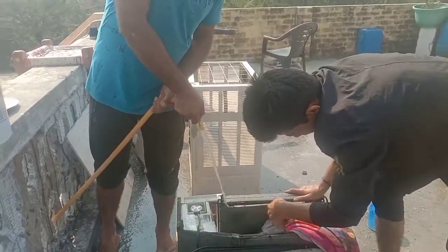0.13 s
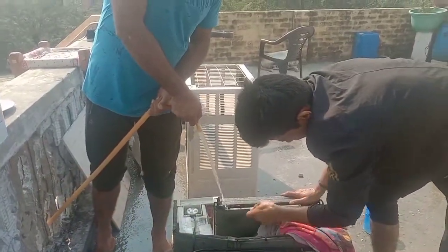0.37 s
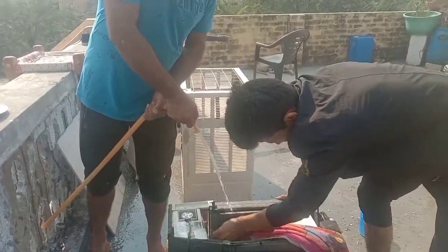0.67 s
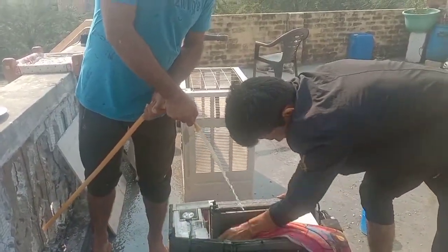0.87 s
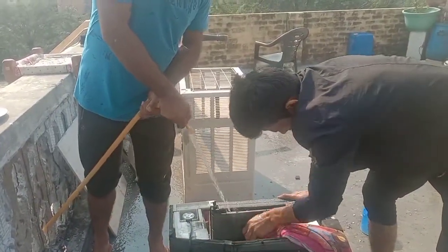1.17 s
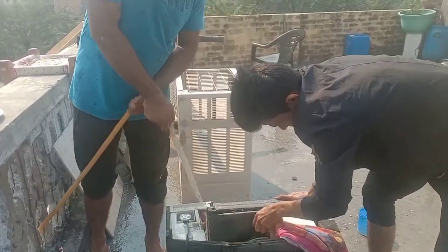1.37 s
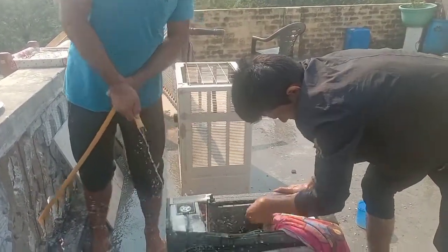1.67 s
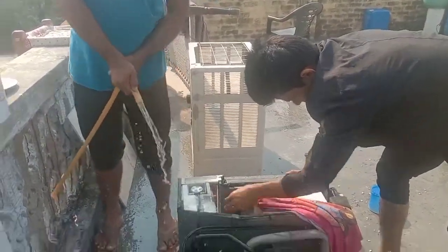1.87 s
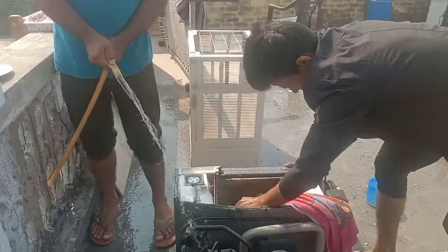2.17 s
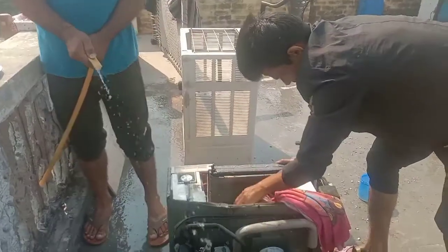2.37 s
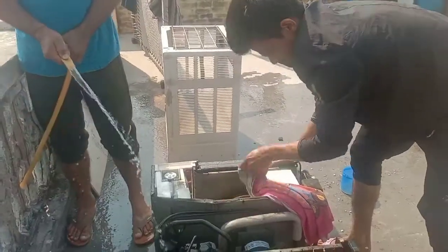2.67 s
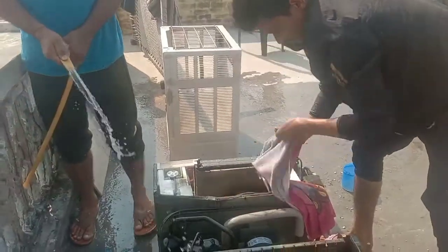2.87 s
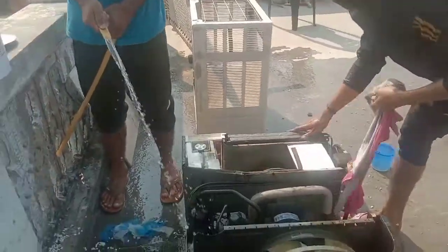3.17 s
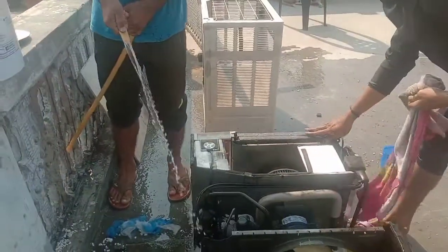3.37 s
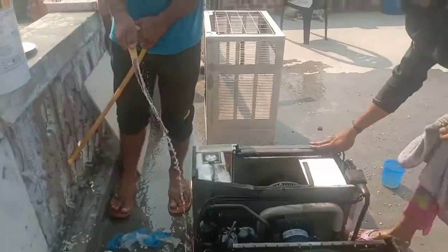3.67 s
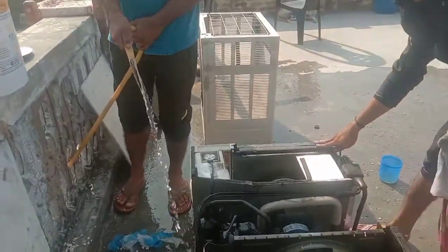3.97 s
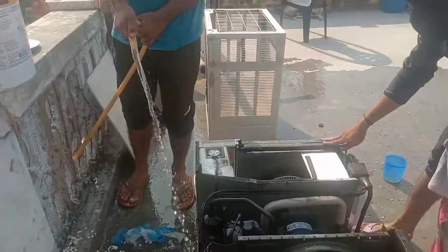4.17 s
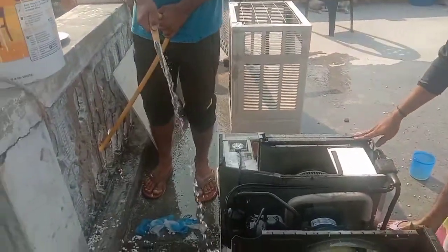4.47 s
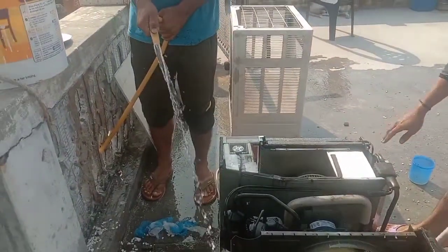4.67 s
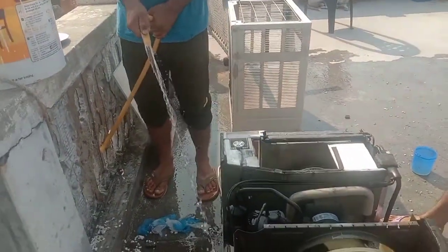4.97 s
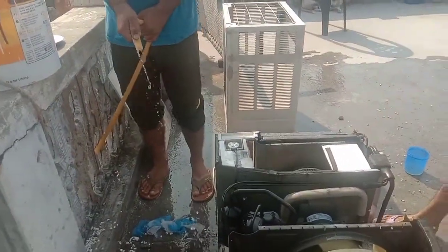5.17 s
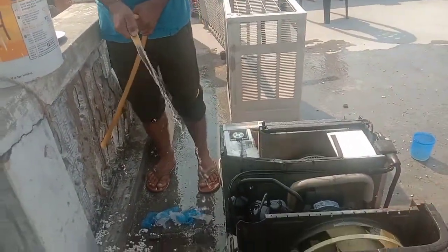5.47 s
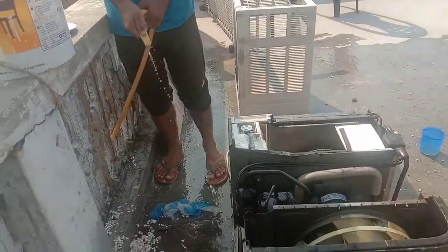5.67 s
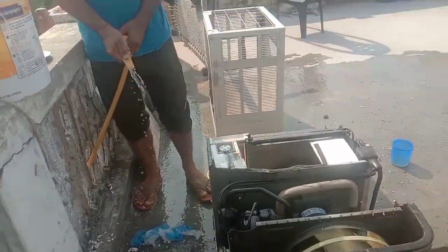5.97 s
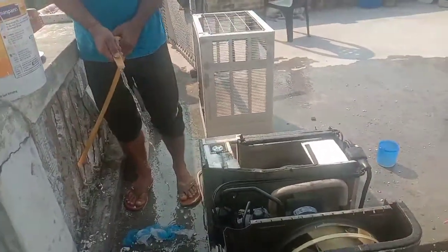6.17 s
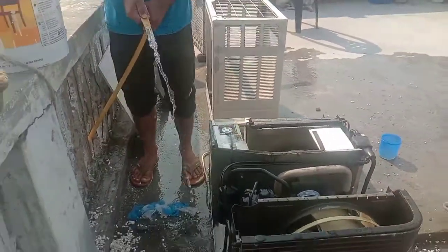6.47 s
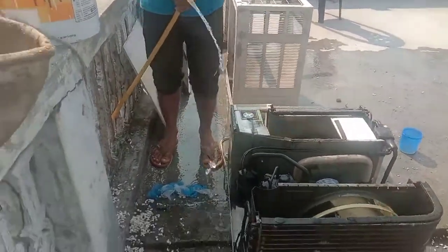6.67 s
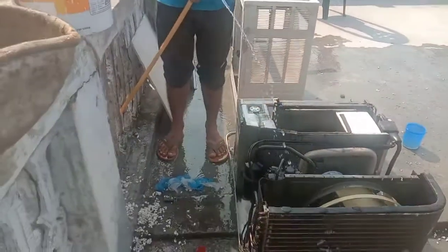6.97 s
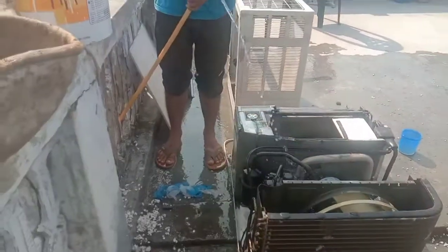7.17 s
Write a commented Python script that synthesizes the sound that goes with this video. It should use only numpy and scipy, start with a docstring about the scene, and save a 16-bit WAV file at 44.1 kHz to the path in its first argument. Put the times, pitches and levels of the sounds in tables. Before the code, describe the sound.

Water first rings and gurgles inside an opened machine's metal tray, then lands in uneven slugs, splats and drops on a wet rooftop floor.

```python
"""On a flat roof a garden hose drums into the metal tray of an opened machine, then its jet breaks up and lands
in slugs and drops on wet concrete and casing. Jet and landings are band noise under moving power; trapped air,
bubbles and the tray's own note are dying sines. Resonances ring the metal with all the water.
A faint town rumble of coloured noise with a hum lies below, and a hand nudges the phone with low thuds."""
import sys
import numpy as np
from scipy import signal
from scipy.fft import rfft, irfft
from scipy.io import wavfile

SR = 44100
rng = np.random.default_rng(int(sys.argv[2]) if len(sys.argv) > 2 else 0)


def put_to_file(sound):
    """Save the sound as 16-bit audio at rate SR, in the file named by the first command-line argument."""
    columns = np.atleast_2d(sound).T  # one column per channel
    safe = np.clip(columns, -1, 1)
    whole_steps = np.round(safe * 32767)
    wavfile.write(sys.argv[1], SR, whole_steps.astype(np.int16))


N = 322679
HOP = 16   # samples per step of the coarse time grid
GRID_S = np.arange(N // HOP + 1) * HOP / SR
BAND_HZ = 130 * 2 ** (np.arange(43) / 6)   # centres of the sixth-octave bands


def from_db(db):
    """Amplitude from dB; twice the dB gives power."""
    return 10 ** (np.asarray(db) / 20)


def rms_one(x):
    """Scales each row to an rms of 1."""
    return x / np.sqrt(np.mean(x ** 2, axis=-1, keepdims=True) + 1e-20)


def drift(rate_hz, count):
    """Slow chance on the coarse grid, spread 1: white noise through two equal lowpass poles."""
    r = np.exp(-2 * np.pi * rate_hz * HOP / SR)
    white = rng.standard_normal((count, N // HOP + 2001))
    slow = signal.lfilter([1], [1, -2 * r, r * r], white)
    return rms_one(slow[:, 2000:])   # the filter has settled by then


def to_samples(coarse):
    """Draws a curve on the coarse grid out to every sample."""
    return np.interp(np.arange(N) / HOP, np.arange(len(coarse)), coarse)


def resonance(x, hz, width_hz):
    """One ringing mode, a two-pole filter with gain 1 on top."""
    r = np.exp(-np.pi * width_hz / SR)
    feed = [(1 - r * r) / 2, 0, (r * r - 1) / 2]
    return signal.lfilter(feed, [1, -2 * r * np.cos(2 * np.pi * hz / SR), r * r], x)


def share(hz, octaves):
    """How the power of one landing spreads over the bands: a bell in log pitch, sum 1."""
    bell = np.exp(-.5 * (np.log2(BAND_HZ[:, None] / hz) / octaves) ** 2)
    return bell / bell.sum(axis=0)


def sound_of(power):
    """Noise gated by each row of power, then rung through its sixth-octave band."""
    out, white, step = np.zeros(N), rng.standard_normal((3, N)), 2 ** (1 / 12)
    for k, hz in enumerate(BAND_HZ):
        band = signal.butter(2, [hz / step, hz * step], "band", fs=SR, output="sos")
        gated = to_samples(np.sqrt(power[k])) * white[k % 3]   # neighbouring bands use different noise
        level = np.sqrt(SR / 2 / (hz * (step - 1 / step)))   # makes up for the narrow band
        out += signal.sosfilt(band, gated) * level
    return out


# The jet and the landings thin out and come back.
# Each row: start in seconds, end in seconds, depth in dB.
JET_BREAKS = [(0.077, 0.151, -8.5), (1.824, 1.871, -10), (2.004, 2.046, -14), (2.613, 2.735, -18.5),
              (2.861, 2.936, -7.5), (2.978, 3.048, -7), (3.296, 3.44, -6.5), (3.457, 3.496, -8),
              (3.671, 3.722, -14.5), (4.266, 4.304, -6), (5.438, 5.631, -17), (6.081, 6.35, -10),
              (6.53, 6.603, -5), (7.175, 7.291, -16.5)]


def breaks_db():
    """The water thins out over 12 ms and returns within the last 2 ms of each break."""
    out = 0
    for start, end, depth_db in JET_BREAKS:
        thinning = np.clip((GRID_S - start) / 0.012, 0, 1)
        until_return = np.clip((end - GRID_S) / 0.002, 0, 1)
        out = out + depth_db * thinning * until_return
    return out


# The running jet, its strength blended from row to row.
# Each row: time in seconds, then relative dB of drumming in the tray, splash, and fine spray.
JET_COURSE = [(0.0, -48.5, -50.5, -71), (0.16, -50, -55.5, -70), (0.61, -52, -51.5, -65),
              (0.96, -56, -54, -72), (1.36, -48, -50.5, -63.5), (1.65, -67, -41.5, -45.5),
              (1.89, -73, -63.5, -75), (2.4, -68.5, -68.5, -57), (2.57, -62.5, -72, -67),
              (2.79, -58, -56.5, -54.5), (2.93, -58, -56, -79), (3.46, -58.5, -51, -52.5),
              (3.97, -70.5, -51.5, -49), (5.24, -60, -44.5, -55.5), (5.4, -75, -61, -66),
              (5.68, -55.5, -59, -64), (5.83, -54.5, -51.5, -53.5), (6.05, -69, -69, -90),
              (6.36, -69.5, -64.5, -62), (6.56, -73.5, -64.5, -71), (6.95, -63, -64.5, -68.5),
              (7.32, -73.5, -57, -55)]
SLOP_LEANS = 0.34     # pooled water slops between drumming and splash: share of the drumming
DRUM_LINGERS = 0.092  # share of a break that the drumming rides through


def jet_levels():
    """The four parts of the jet in relative dB: drumming, slop, splash and spray."""
    s, *columns = np.transpose(JET_COURSE)
    drum, splash, spray = [np.interp(GRID_S, s, db) for db in columns]
    slop = SLOP_LEANS * drum + (1 - SLOP_LEANS) * splash
    break_share = np.array([[1 - DRUM_LINGERS], [1], [1], [1]])
    return np.array([drum, slop, splash, spray]) + breaks_db() * break_share


# Where the four parts of the jet sit in pitch, from drumming to spray.
# Each entry: frequency in Hz.
JET_PART_HZ = [380, 1050, 3500, 11000]
DROPS_PER_S, DROP_SPREAD_DB = 500, 3
DROP_CYCLES = 88    # cycles in which a drop dies by 60 dB, the pitch held within 1200 to 5000 Hz
DROP_SHARE = 0.58   # most of a band's power that comes in drops


def stream(flicker_db, surge_db):
    """Power per band of the running jet: an even wash, and small drops that light up some bands and die."""
    parts = np.arange(len(JET_PART_HZ))
    place = np.interp(np.log(BAND_HZ), np.log(JET_PART_HZ), parts)
    blend = np.clip(1 - abs(place[:, None] - parts), 0, 1)   # each band lies between two parts
    below_db = -14 * np.clip(np.log2(270 / BAND_HZ), 0, None)   # little lies under the note of the tray
    mean_db = blend @ jet_levels() + below_db[:, None] - 12.0

    draw = rng.random((mean_db.shape[1], 4))
    born = draw[:, 0] < DROPS_PER_S * HOP / SR
    size, pitch, width = draw[born, 1:].T
    strength = from_db(2 * DROP_SPREAD_DB * np.minimum(-np.log(size), 2.8))
    hits = np.zeros_like(mean_db)
    hits[:, born] = strength * share(400 * 2 ** (5.4 * pitch), 0.47 + 0.97 * width * pitch)   # high drops spread
    poles = from_db(-120 * HOP / SR * np.clip(BAND_HZ, 1200, 5000) / DROP_CYCLES)
    dying = np.array([signal.lfilter([1], [1, -r], row) for r, row in zip(poles, hits)])
    drops = np.clip(DROP_SHARE * place / 2, 0, DROP_SHARE)[:, None]   # the low roar stays even
    grain = 1 - drops + drops * dying / dying.mean(axis=1, keepdims=True)

    flicker = np.clip(place / 2, .55, 1)[:, None] * drift(10.0, count=len(BAND_HZ))
    wobble_db = flicker_db * flicker + surge_db * drift(32.5, count=1)
    return from_db(1.9955 * (mean_db + wobble_db)) * grain


# Slugs and big drops landing.
# Each row: start in seconds, level in dB, centre in Hz, width in octaves, spatter in dB against the slap.
LANDINGS = [(0.147, -22, 2050, 0.64, -6.5), (0.497, -26.5, 1760, 0.41, -4), (1.6767, -14, 1276, 1.8, -24),
            (1.6915, -6, 2276, 0.5, -10.5), (1.7774, -19, 1210, 1.9, -20),
            (1.8739, -10.5, 2550, 0.29, -20.5), (1.88, -30, 1192, 0.29, -15),
            (2.053, -27.5, 5470, 0.41, -10), (2.069, -26, 7700, 0.44, -10), (2.206, -27.5, 5100, 0.38, -25),
            (2.222, -28, 5700, 0.4, -13.5), (2.299, -27.5, 12000, 0.4, -11),
            (2.3247, -11, 3370, 1.53, -17.5), (2.402, -35, 1320, 1.17, 10),
            (2.489, -18.5, 2870, 1.16, -15.5), (2.509, -20, 1420, 0.49, -17),
            (2.739, -37.5, 3720, 0.5, 6.5), (2.774, -24.5, 4640, 0.15, -15), (2.811, -20, 2260, 1, -6),
            (2.827, -19, 2400, 0.33, -13), (2.8519, -25, 8250, 0.69, -4), (2.953, -25.5, 1320, 1.4, 1),
            (3.06, -21.5, 3900, 0.63, -25), (3.0775, -20, 2700, 0.97, -15), (3.146, -27.5, 6700, 0.29, -11),
            (3.208, -31.5, 2970, 0.66, 1.5), (3.3883, -24.5, 7030, 0.1, -18),
            (3.591, -25.5, 4860, 0.42, -2.5), (3.71, -29, 1390, 0.15, -17), (3.788, -20, 6700, 0.44, -9),
            (3.809, -20.5, 4180, 0.2, -31), (3.871, -23.5, 938, 0.65, -1), (3.916, -22, 5400, 0.39, -31),
            (3.936, -23, 6300, 0.39, -3.5), (4.024, -21.5, 3500, 0.36, -1), (4.153, -14, 3270, 0.43, -13),
            (4.302, -18, 4300, 0.34, -14), (4.3635, -14, 1745, 0.56, -10), (4.413, -18, 2600, 1.48, -5.5),
            (4.481, -26, 1223, 0.87, -2), (4.571, -20, 5700, 0.29, -40), (4.883, -39, 5260, 0.18, -29),
            (4.966, -27, 3030, 0.4, -5), (5.1185, -10, 2140, 0.9, -9.5), (5.3007, -18.5, 1650, 1.23, -10),
            (5.319, -17.5, 2280, 0.28, -14), (5.4001, -16, 2710, 0.66, -24), (5.5515, -23, 5900, 0.8, -22),
            (5.586, -14, 7750, 0.38, -23), (5.636, -26, 2950, 0.56, 7), (5.642, -10, 2430, 0.97, -10.5),
            (5.705, -16, 2580, 0.89, -8), (5.7876, -23.5, 6030, 0.16, -10.5),
            (5.864, -24.5, 4140, 0.33, -22), (5.9891, -20.5, 2520, 0.19, -15.5),
            (6.022, -28, 2350, 0.67, -16), (6.138, -29, 10400, 0.12, -13), (6.2519, -26, 1930, 0.39, -9.5),
            (6.38, -15.5, 4370, 0.58, -26), (6.4002, -16, 4420, 0.73, -15.5),
            (6.49, -15.5, 3450, 0.28, -22), (6.576, -17, 3410, 0.3, -27), (6.5939, -23, 3500, 0.33, -23),
            (6.619, -20.5, 5300, 0.5, -16), (6.645, -20, 5240, 0.21, -13), (6.6594, -21, 2510, 0.34, -18),
            (6.795, -27, 5660, 0.63, -12), (6.826, -23, 9300, 0.57, -10), (6.86, -17, 7000, 0.71, -11),
            (6.873, -18, 2900, 0.18, -29), (6.8873, -11, 4300, 0.7, -20.5), (6.903, -18.5, 2500, 0.63, -8),
            (7.149, -30.5, 7550, 0.39, -18), (7.3, -32, 1675, 0.075, -12), (7.313, -11.5, 4180, 0.17, -13)]
# Slugs that boom in the hollow of the tray.
# Each row: start in seconds, level in dB, centre in Hz.
TRAY_BOOMS = [(0.153, -26.5, 490), (1.535, -28, 477), (1.635, -22, 472), (1.692, -27, 223),
              (1.708, -22, 513), (1.759, -20.5, 487), (2.324, -29, 316), (2.811, -31, 380),
              (3.884, -37, 304), (4.606, -27.5, 435), (5.121, -28.5, 311), (5.647, -27, 444)]
BOOM_OCTAVES, BOOM_SPATTER_DB, BOOM_RISE_S = 0.16, -5.5, 0.0054
SLAP_T60_S, SPATTER_T60_S, HOLD_S = 0.031, 0.26, 0.00184   # slap time holds up to 2 kHz
SLAP_SHORTENS = 0.083   # the slap dies faster in the treble: power of pitch over 2 kHz
CRACK_DB, CRACK_T60_S = 2, 0.014   # first contact is a short crack on top of the slap
RISE_S = 0.0026    # build-up of a landing with spatter at -32.5 dB
LOOSE_DB = 11.5    # a looser slug, with this much more spatter, takes twice as long to build
RAGGED_DB = 3.5


def splats():
    """Power per band of the big landings: a ragged slap, then a longer spatter as the water spreads."""
    out, age = np.zeros((len(BAND_HZ), N // HOP + 2001)), np.arange(2000) * HOP / SR
    after_hold = np.clip(age - HOLD_S, 0, None)
    slap_t60 = SLAP_T60_S * np.clip(BAND_HZ[:, None] / 2000, 1, None) ** -SLAP_SHORTENS
    dying = from_db(-120 * after_hold / slap_t60)
    dying += from_db(2 * CRACK_DB - 120 * after_hold / CRACK_T60_S)
    booms = [(*boom, BOOM_OCTAVES, BOOM_SPATTER_DB) for boom in TRAY_BOOMS]
    for s, db, hz, octaves, spatter_db in list(LANDINGS) + booms:
        body, spray = share(hz, max(octaves, .1)), share(1.43 * hz, 1.0)
        slap = (body + 0.016 * spray) * dying
        spatter = (body + 0.33 * spray) * from_db(2 * spatter_db - 120 * age / SPATTER_T60_S)
        rise_s = BOOM_RISE_S if hz < 600 else RISE_S * 2 ** ((spatter_db + 32.5) / LOOSE_DB)
        level = from_db(2 * (db - 14.5))   # noise peaks over its rms
        at = round(s * SR / HOP)
        out[:, at:at + len(age)] += level * (slap + spatter) * (1 - np.exp(-age / rise_s))
    # a slug lands in pieces
    ragged_db = RAGGED_DB * np.clip(drift(176, count=1), -2.5, .8) + 2.85 * drift(51, count=len(BAND_HZ))
    return out[:, :N // HOP + 1] * from_db(2 * (ragged_db + breaks_db()))


PLOP_DB, PLOP_CYCLES = -3, 60   # level against the landing before its width counts; cycles to die by 60 dB


def plops():
    """Each big landing traps a pocket of air that rings at its own rising pitch; broad slaps ring less."""
    out, age = np.zeros(N + 4000), np.arange(4000) / SR
    for s, db, hz, octaves, spatter_db in LANDINGS:
        note = np.sin(2 * np.pi * hz * age * (1 + 3.5 * age)) * (1 - np.exp(-age / RISE_S))
        at = round((s + HOLD_S) * SR)
        level_db = db + PLOP_DB - 9.0 * octaves
        out[at:at + len(age)] += from_db(level_db - 60 * age * hz / PLOP_CYCLES) * note
    return out[:N]


THUMP_DB, THUMP_CYCLES = -9.5, 13.4   # level against the boom; cycles to die by 60 dB


def thumps():
    """Each boom starts with a few cycles of the tray's own note, a quickly dying sine."""
    out, age = np.zeros(N + 4000), np.arange(4000) / SR
    for s, db, hz in TRAY_BOOMS:
        note = (1 - np.exp(-age * hz)) * np.sin(2 * np.pi * hz * age)
        at = round(s * SR)
        out[at:at + len(age)] += from_db(db + THUMP_DB - 60 * age * hz / THUMP_CYCLES) * note
    return out[:N]


# Clear bubbles that ring out of the puddles.
# Each row: start in seconds, level in dB, starting pitch in Hz, time to die by 60 dB in seconds.
PUDDLE_BUBBLES = [(2.397, -37, 2680, 0.046), (3.547, -33.5, 1600, 0.051), (6.0, -37, 2990, 0.047),
                  (6.027, -27, 1930, 0.018), (6.034, -28, 2060, 0.024), (7.03, -44, 1190, 0.041),
                  (7.1, -48.5, 1060, 0.15)]
GURGLE_RISE_PER_S = 1.1   # pitch grows by twice this share per second as the bubble nears the surface


def gurgles():
    """Each bubble rings as a dying, rising sine."""
    out, age = np.zeros(N + 6000), np.arange(6000) / SR
    for s, db, hz, t60 in PUDDLE_BUBBLES:
        phase = 2 * np.pi * hz * age * (1 + GURGLE_RISE_PER_S * age)
        note = np.sin(phase) * (1 - np.exp(-age / RISE_S))
        at = round(s * SR)
        out[at:at + len(age)] += from_db(db - 60 * age / t60) * note
    return out[:N]


BUBBLES_PER_S, BUBBLE_T60_S = 700, 0.042
BUBBLE_RISE = 0.02   # pitch grows by twice this share over the ring
BUBBLE_DB, BUBBLE_SPREAD_DB = 13, 12   # loudest bubble over the water around it; range below that


def bubbles(power):
    """Air caught in the churn: thin rising notes at random, following the water's level near their pitch."""
    when, pitch, size = rng.random((round(BUBBLES_PER_S * N / SR), 3)).T
    hz, at = 700 * 2 ** (4.0 * pitch), (when * N).astype(int)
    band = np.round(6 * np.log2(hz / BAND_HZ[0])).astype(int)
    around = np.sqrt(power[band, at // HOP])
    age = np.arange(1800) / SR
    shape = from_db(-60 * age / BUBBLE_T60_S) * (1 - np.exp(-age / RISE_S))
    notes = shape * np.sin(2 * np.pi * hz[:, None] * age * (1 + BUBBLE_RISE * age / BUBBLE_T60_S))
    notes *= (around * from_db(BUBBLE_DB - BUBBLE_SPREAD_DB * size))[:, None]
    spots = at[:, None] + np.arange(1800)
    return np.bincount(spots.ravel(), notes.ravel(), N + 1800)[:N]


# What the opened machine rings with, from the hollow of the tray to the sheet metal.
# Each row: frequency in Hz, width in Hz, level in dB against the water before the aim wanders.
MACHINE_MODES = [(351.5, 39, 3.5), (302, 31, 0.5), (469.4, 35, -7.5), (932, 33, -1), (2725, 76, -3.5),
                 (3200, 260, -7), (3736, 235, -5.5), (5250, 380, -2)]
AIM_DB, AIM_HZ = 10.5, 5.6   # spread and rate of the wander before it is eased and limited
TRAY_STEADY_HZ = 870         # modes below this are fed more evenly
# Two notes that follow the jet's aim at their part of the machine: frequency in Hz, width in Hz.
TRAY_WALL, CASING = (555, 26), (1259, 60)
# How strongly the jet feeds these two notes.
# Each row: time in seconds, tray wall in dB, casing in dB.
JET_AIM = [(0.0, 9.5, 6), (0.45, 13.5, 6), (0.7, 1, 12), (1.4, -9, 10), (1.7, 3, 8.5), (2.9, 5, 11.5),
           (3.3, -28, 0), (4.3, -4, -10), (4.5, -23, 9), (5.25, -20, 13), (5.5, -1, 7), (7.3, 5, -3)]


def machine(water):
    """The water rings the metal's resonances; as the jet wanders it feeds now one mode, now another."""
    aim_db, out = AIM_DB * drift(AIM_HZ, count=len(MACHINE_MODES)), water.copy()
    for (hz, width_hz, db), wander_db in zip(MACHINE_MODES, aim_db):
        eased_db = np.clip(wander_db * min(hz / TRAY_STEADY_HZ, 1), -12, 5)
        gain = to_samples(from_db(db + eased_db))
        out += resonance(gain * water, hz, width_hz)
    s, *fed_db = np.transpose(JET_AIM)
    for (hz, width_hz), db in zip((TRAY_WALL, CASING), fed_db):
        gain = from_db(np.interp(np.arange(N) / SR, s, db))
        out += resonance(gain * water, hz, width_hz)
    return out


# A hand on the phone.
# Each row: start in seconds, level in dB, frequency in Hz, time to die by 60 dB in seconds.
HAND_NUDGES = [(0.087, -40, 69.5, 0.12), (0.449, -45, 67.3, 0.06)]


def nudges():
    """Each touch is a soft low thud, a dying sine with a rounded start."""
    out, t = np.zeros(N), np.arange(N) / SR
    for s, db, hz, t60 in HAND_NUDGES:
        age = np.clip(t - s, 0, None)
        fade = from_db(db + 4.0 - 60 * age / t60)   # 4 dB make up for the slow rise
        out += fade * (1 - np.exp(-age / .008)) * np.sin(2 * np.pi * hz * age)
    return out


# The colour of the far town.
# Each row: frequency in Hz, relative level per Hz in dB.
TOWN_COLOUR = [(25, 2), (60, 2.5), (150, 14), (350, 13.5), (600, 2.5), (1300, 8.5), (3000, -13.5),
               (8000, -20), (16000, -17)]
TOWN_DB, HUM_HZ, HUM_DB = -67.5, 96, -73.5   # rms levels before the microphone


def town():
    """Smooth far noise shaped in pitch, and a wavering hum of machinery from narrow noise."""
    hz = np.fft.rfftfreq(N, 1 / SR) + 1
    colour_hz, colour_db = np.transpose(TOWN_COLOUR)
    colour = from_db(np.interp(np.log(hz), np.log(colour_hz), colour_db))
    far = rms_one(irfft(rfft(rng.standard_normal(N)) * colour, N))
    hum_band = signal.butter(2, [HUM_HZ - 12, HUM_HZ + 12], "band", fs=SR, output="sos")
    hum = rms_one(signal.sosfilt(hum_band, rng.standard_normal(N)))
    return from_db(TOWN_DB) * far + from_db(HUM_DB) * hum


def scene():
    """The water, coloured by the machine, over the town; both channels carry the same sound."""
    power = stream(flicker_db=4.5, surge_db=2.0) + splats()
    water = sound_of(power) + plops() + thumps() + gurgles() + bubbles(power)
    return np.tile(machine(water) + town() + nudges(), (2, 1))


def peak(x, hz, width_hz, db):
    """Lifts or cuts one region by adding a resonance to the sound itself."""
    return x + (from_db(db) - 1) * resonance(x, hz, width_hz)


# Microphone colour.
# Each row: frequency in Hz, width in Hz, lift or cut in dB.
MIC_PEAKS = [(7093, 213, 8), (10060, 1300, 6), (13500, 1700, -9), (15480, 2010, 16.5)]
SHELF_HZ, SHELF_DB = 7750, -9   # the microphone hears the top treble more faintly
CUTOFF_HZ = 16500


def record(dry):
    """The colour of the small microphone, by shelf and resonances, then the cut at the top."""
    low, high = [np.tile(signal.butter(6, SHELF_HZ, kind, fs=SR, output="sos"), (2, 1))
                 for kind in ("low", "high")]   # each filter runs twice
    dry = signal.sosfilt(low, dry) + from_db(SHELF_DB) * signal.sosfilt(high, dry)
    for hz, width_hz, db in MIC_PEAKS:
        dry = peak(dry, hz, width_hz, db)
    return signal.sosfilt(signal.cheby2(14, 75, CUTOFF_HZ, fs=SR, output="sos"), dry)


dry = scene()
out = record(dry)
put_to_file(out)
```